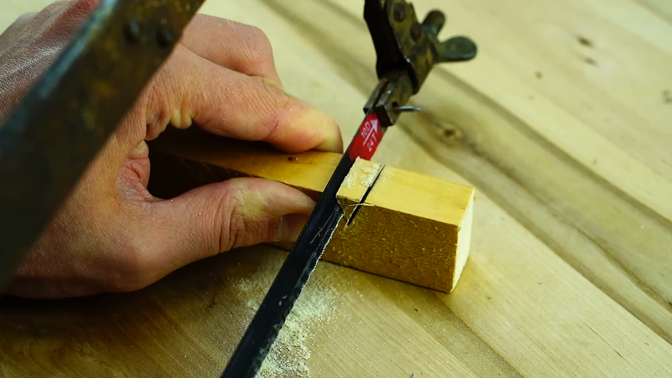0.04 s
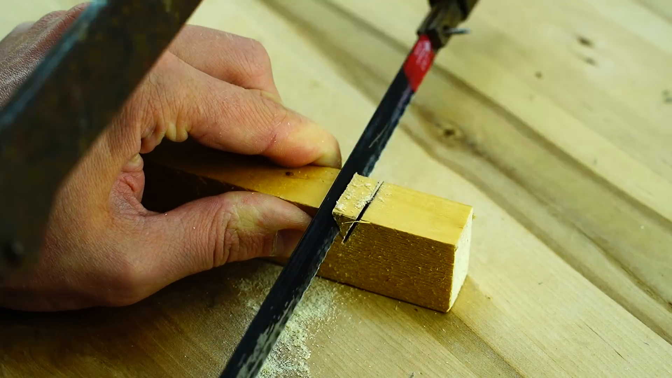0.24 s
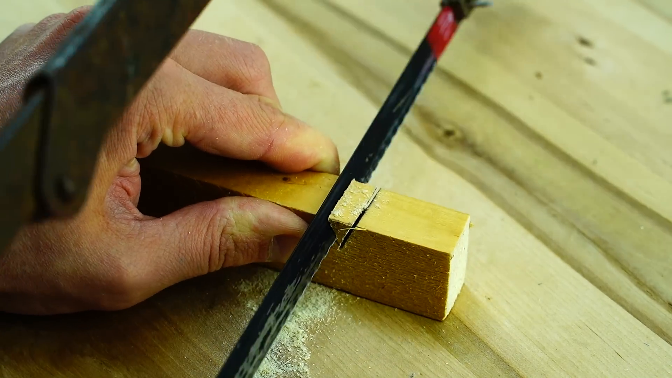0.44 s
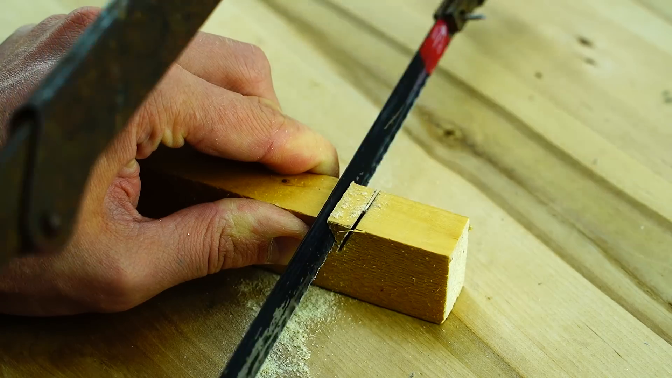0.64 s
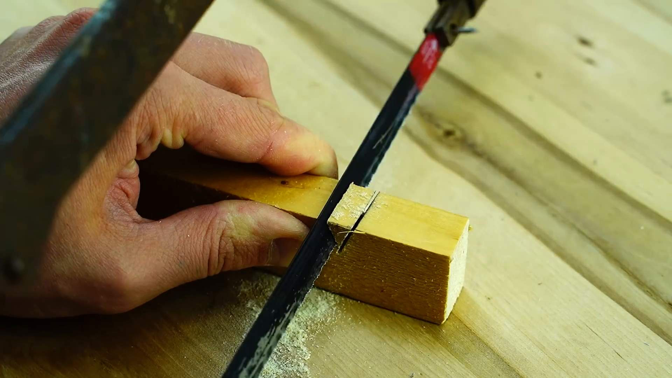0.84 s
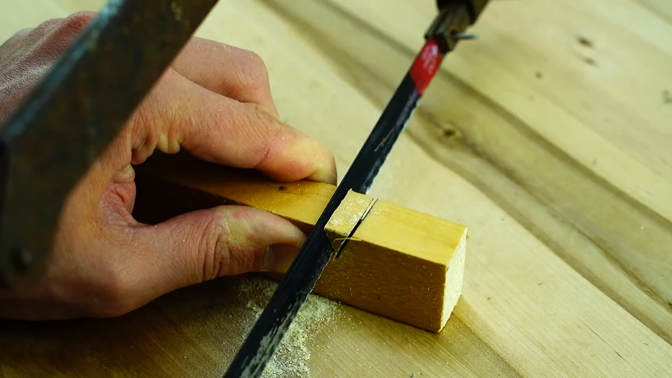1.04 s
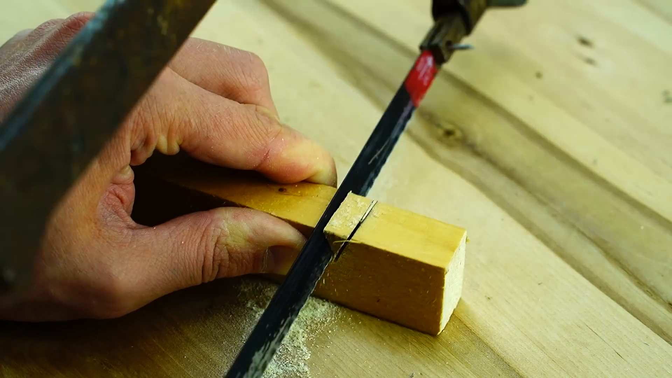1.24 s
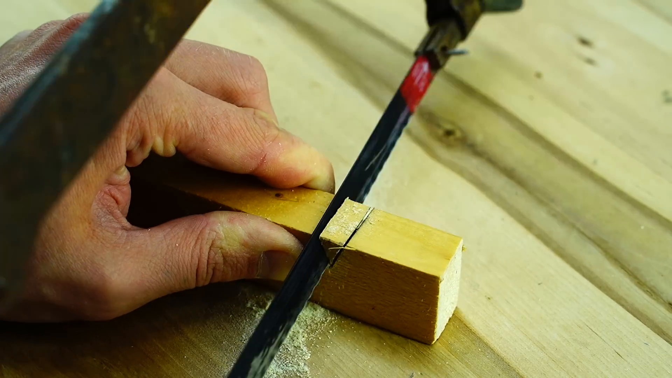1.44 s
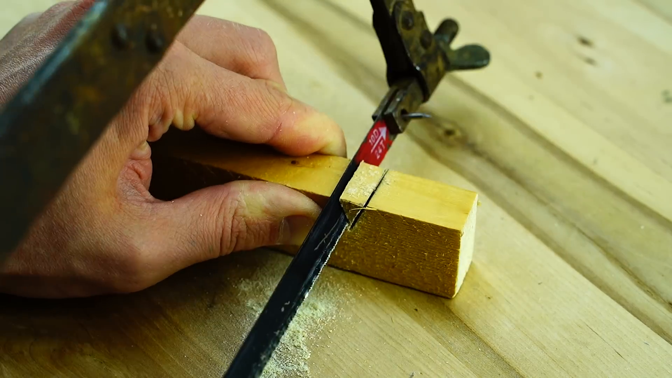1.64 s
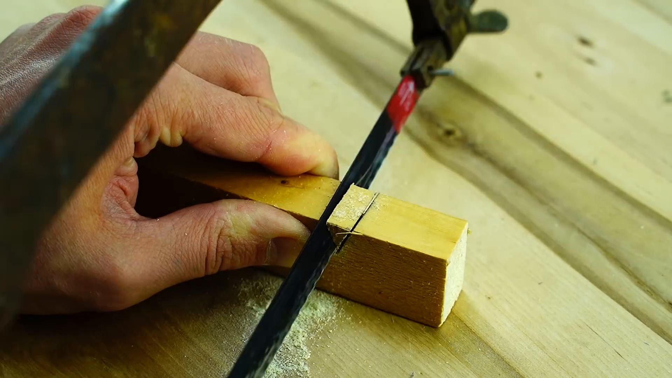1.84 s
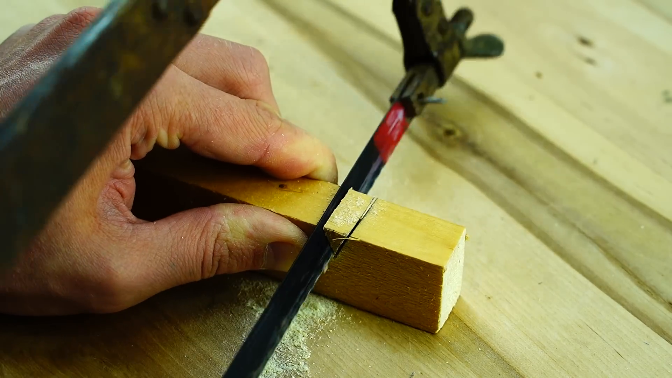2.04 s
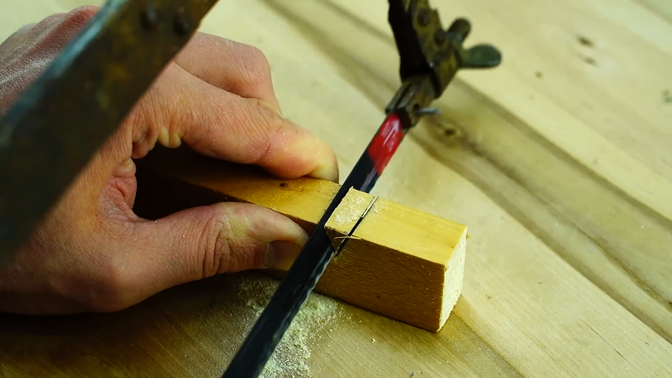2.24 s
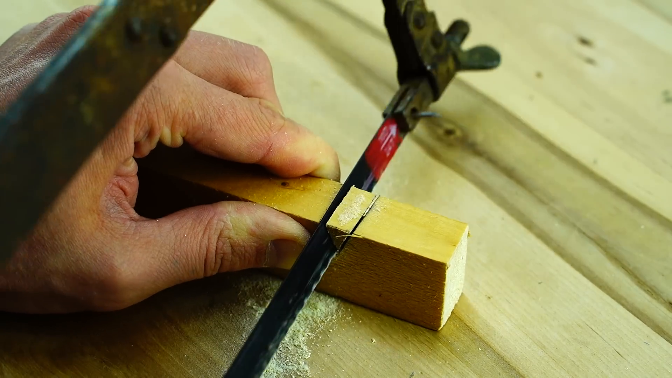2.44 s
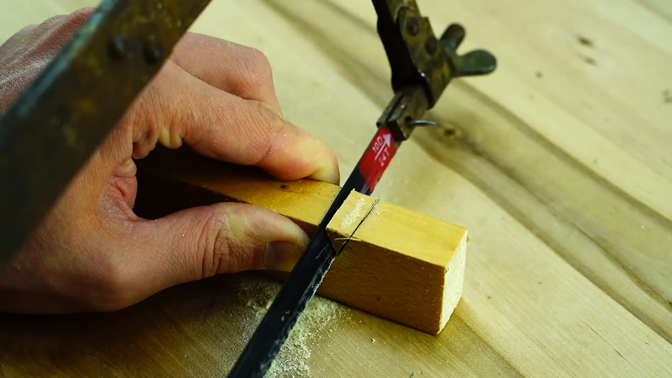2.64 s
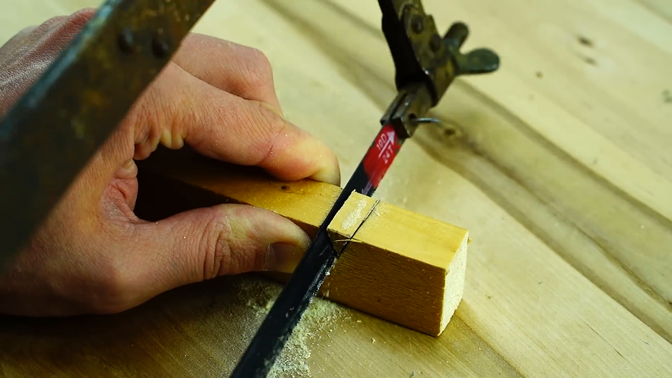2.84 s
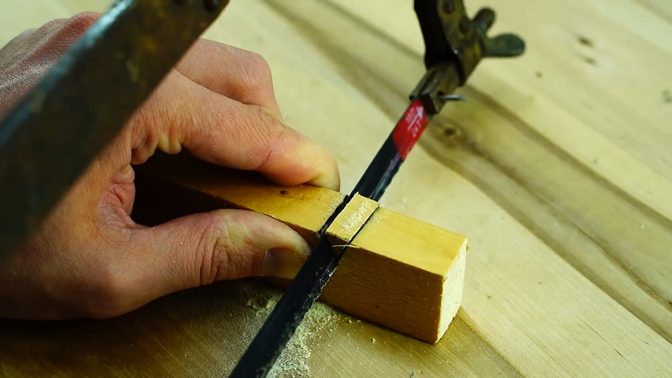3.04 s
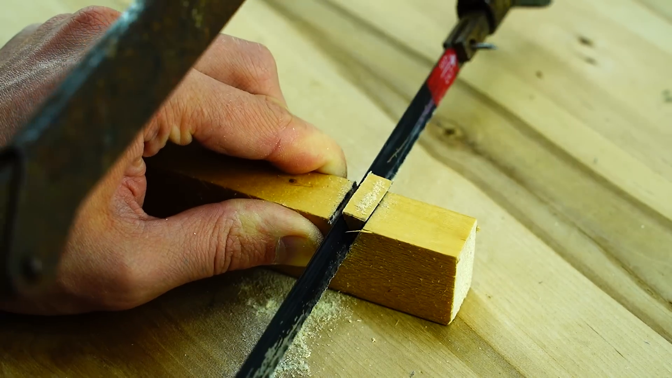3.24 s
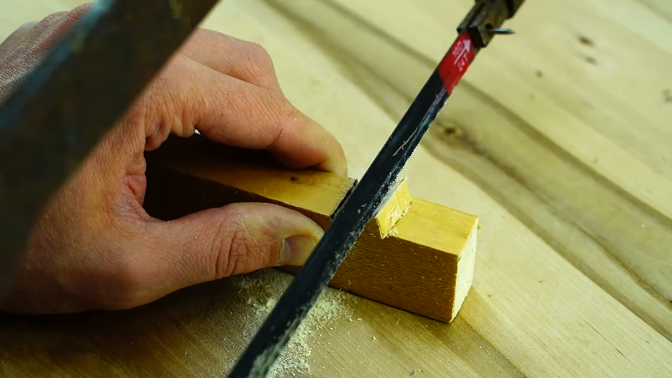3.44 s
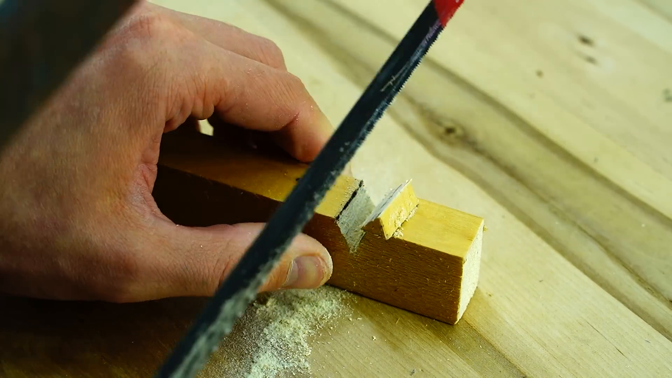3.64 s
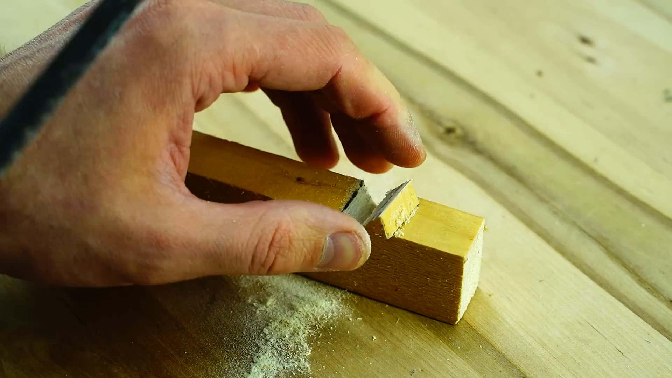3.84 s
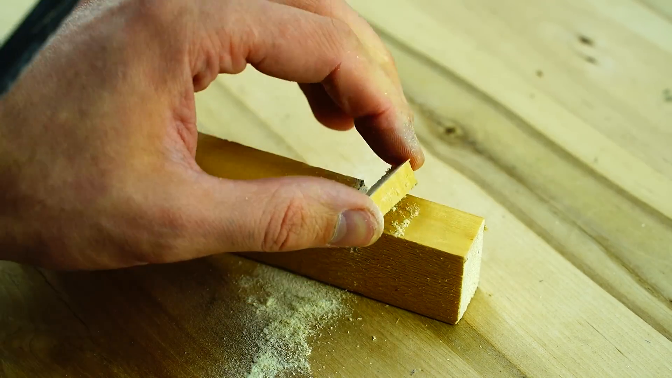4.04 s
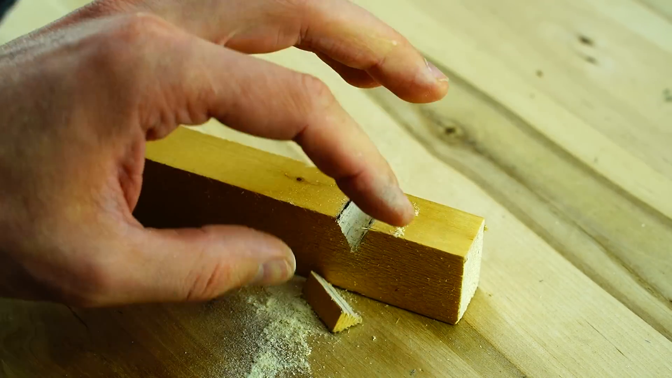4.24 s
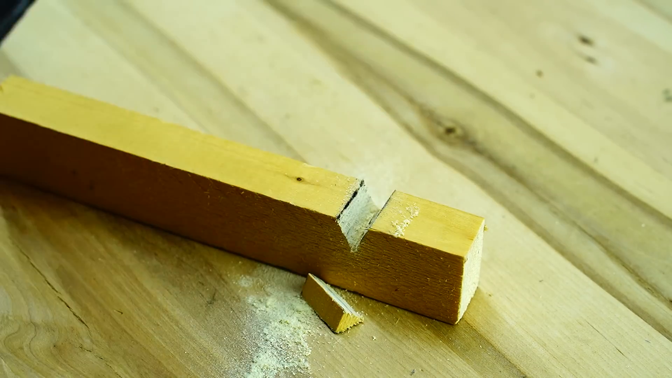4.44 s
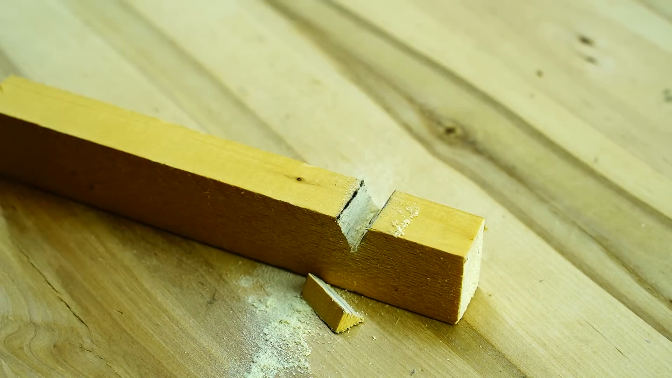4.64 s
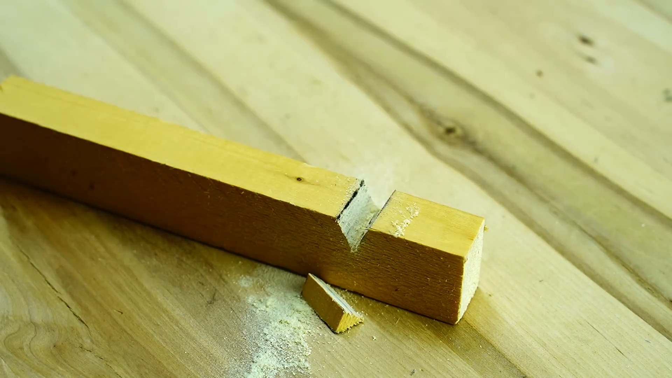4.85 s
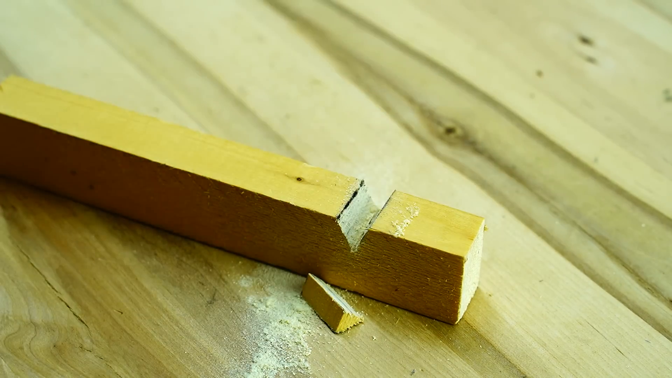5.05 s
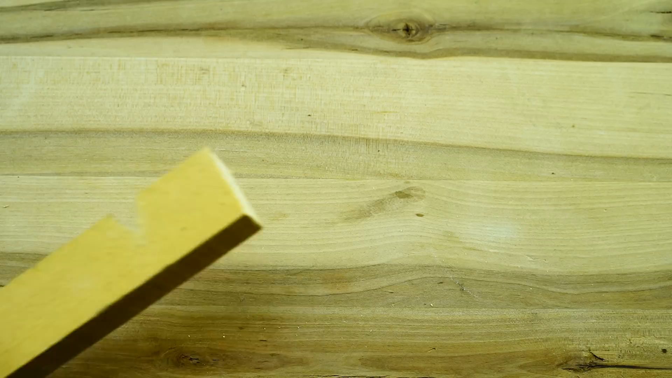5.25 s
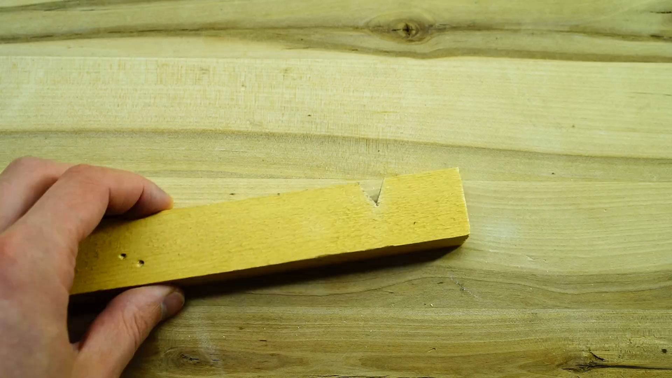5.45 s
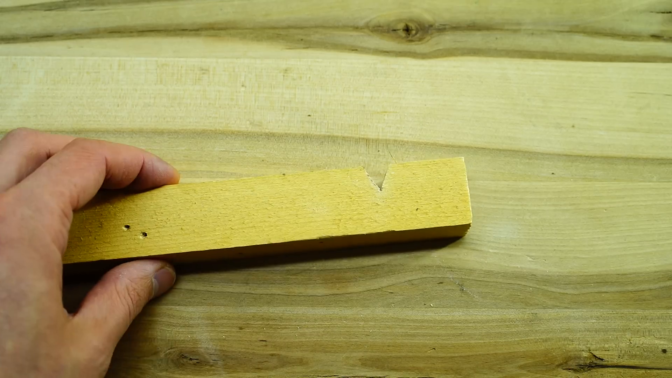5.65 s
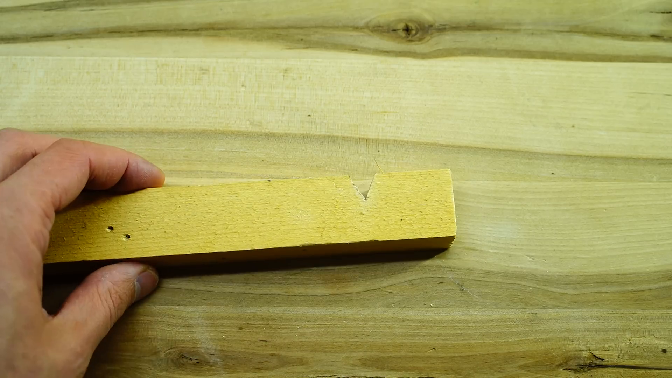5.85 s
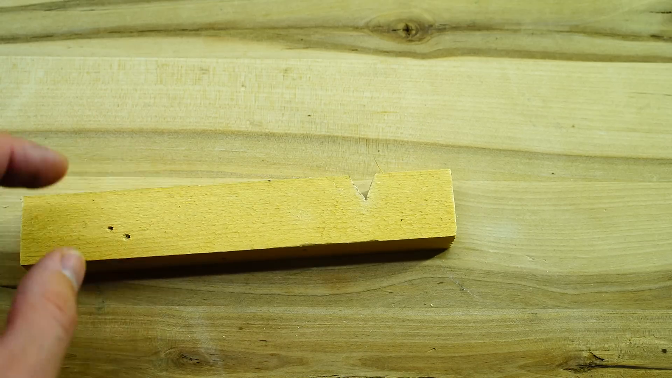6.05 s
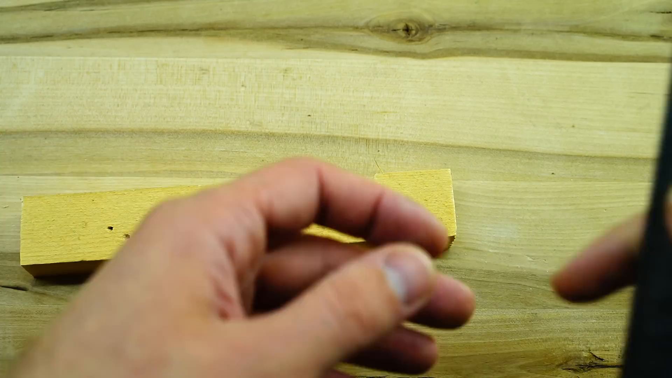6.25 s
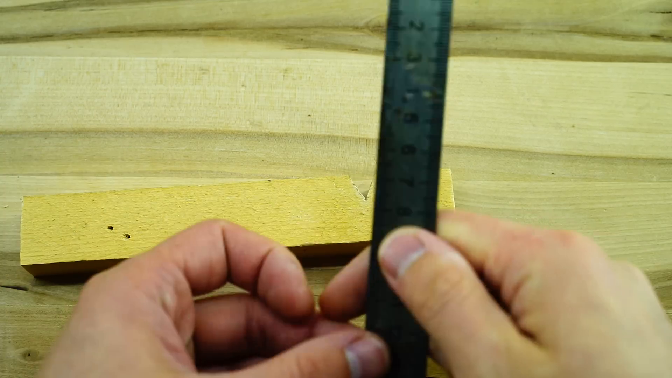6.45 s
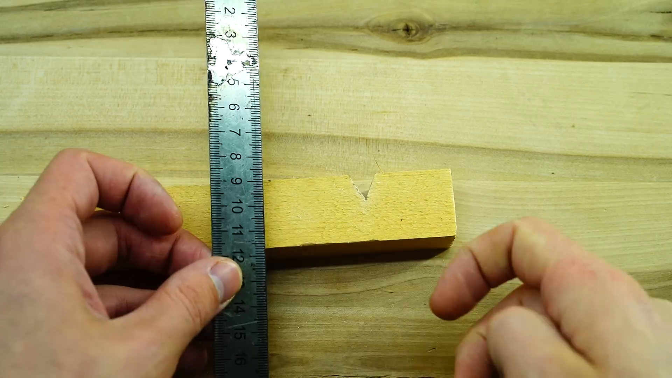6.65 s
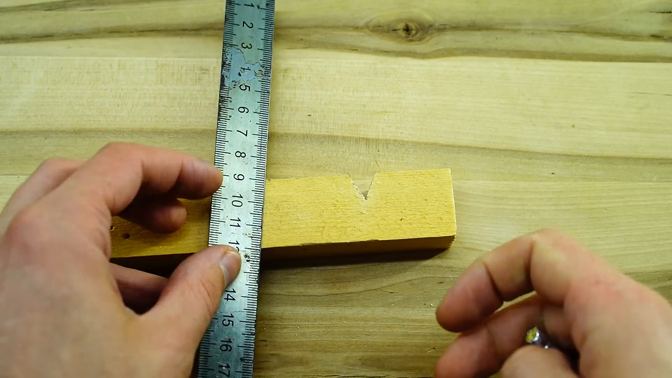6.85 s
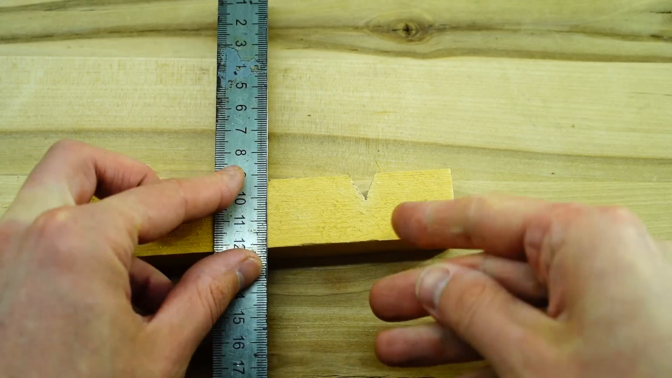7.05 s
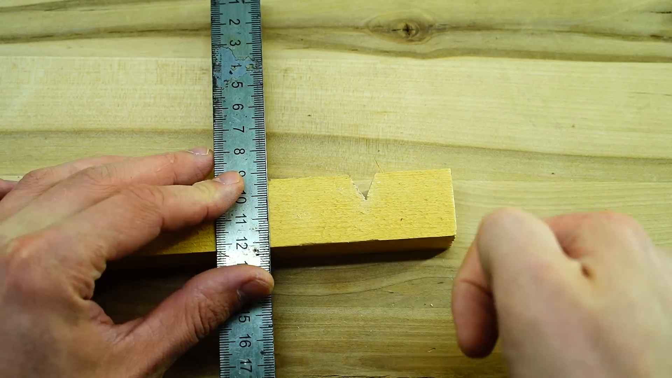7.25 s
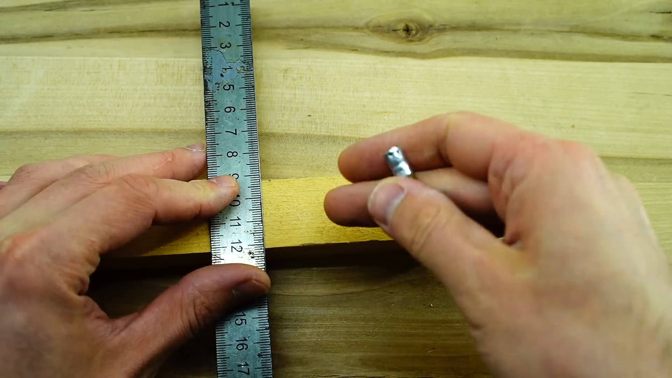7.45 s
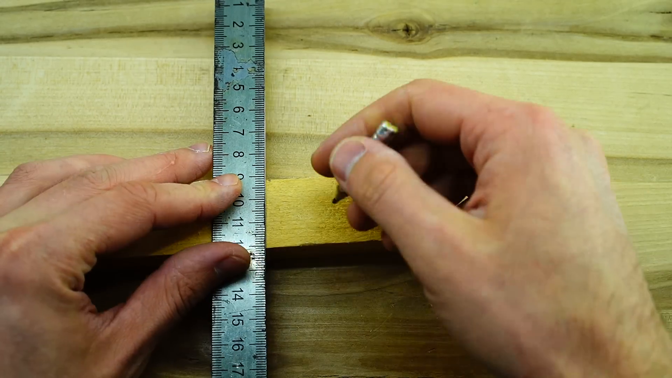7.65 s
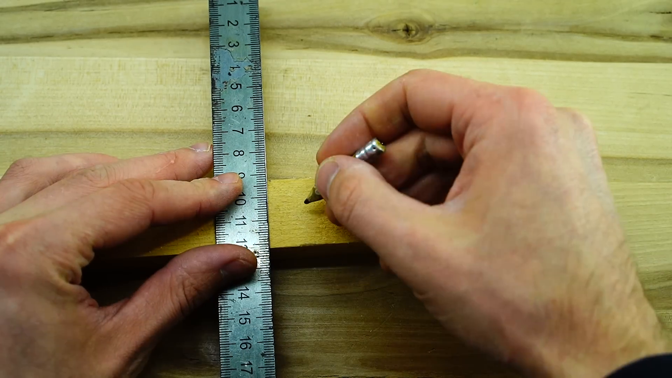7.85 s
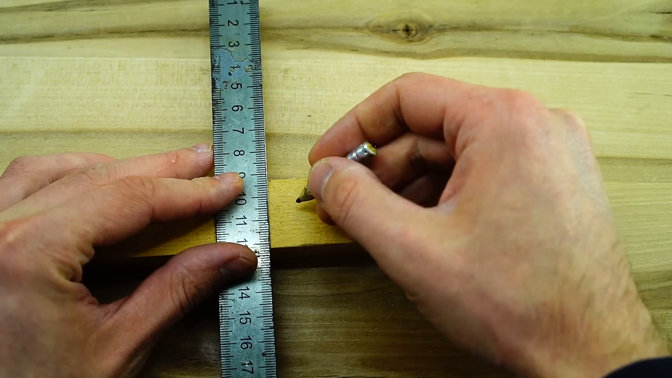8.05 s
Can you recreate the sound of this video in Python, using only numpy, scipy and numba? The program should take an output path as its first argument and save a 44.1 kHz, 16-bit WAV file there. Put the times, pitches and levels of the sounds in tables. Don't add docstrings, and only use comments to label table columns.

```python
import sys
import numpy as np
from scipy import signal
from scipy.fft import rfft, irfft
from scipy.io import wavfile
from scipy.ndimage import uniform_filter1d
from numba import njit

SR = 44100
rng = np.random.default_rng(int(sys.argv[2]) if len(sys.argv) > 2 else 0)


def nominal_scale(level):
    x = np.asarray(level, float) / 20
    return 10 ** x


def digitize_waveform(pressure):
    field = np.atleast_2d(pressure).T
    bounded = np.clip(field, -1, 1)
    quanta = np.round(bounded * 32767).astype(np.int16)
    wavfile.write(sys.argv[1], SR, quanta)


N = 357210
T = np.arange(N) / SR
EARS = np.array([[1], [-1]])


def unit(x):
    return x / np.sqrt(np.mean(x ** 2))


def colour(x, points, lo_hz=0, hi_hz=SR):
    f = np.arange(N // 2 + 1) * SR / N + 1
    hz, db = np.transpose(points)
    gain = nominal_scale(np.interp(np.log(f), np.log(hz), db))
    return irfft(rfft(x) * gain * (f > lo_hz) * (f < hi_hz), N)


@njit
def svf(x, hz, width):
    y, b, l = np.empty(len(x)), 0., 0.
    for i in range(len(x)):
        g, k = np.tan(np.pi * hz[i] / SR), width / hz[i]
        v = (b + g * (x[i] - l)) / (1 + g * (g + k))
        b, l, y[i] = 2 * v - b, l + 2 * g * v, k * v
    return y


def walk(rate):
    k = int(SR / rate)
    held = np.repeat(rng.standard_normal(N // k + 1), k)
    return unit(uniform_filter1d(uniform_filter1d(held, k), k)[:N])


def modes(x, table, clump_db=2.5, drift=.012):
    out = 0
    for k, (hz, width_hz, db) in enumerate(table):
        gain = (-1) ** k * nominal_scale(db + clump_db * walk(22.01)) / np.sqrt(width_hz)
        out = out + gain * svf(x, hz * (1 + drift * walk(12)), 1. * width_hz)
    return out


def spread(mid, other, side_points, turned=0):
    side = turned * signal.hilbert(mid).imag + np.sqrt(1 - turned ** 2) * other
    return mid + EARS * colour(side, side_points)


# offset_s, level_db
TURN_FORCE = [(-.04, -29.5), (-.006, -31), (0, -5.5), (0, -7.5), (0.018, -18), (.12, -24.5)]


def force(bite_s, lift_s, levels_db):
    s, db = np.transpose(TURN_FORCE)
    plateau_s = bite_s + (lift_s - bite_s) * np.array([1, 3, 5]) / 6
    slow = np.clip(3.0 + (levels_db[1] - levels_db[0]) / 2.7, 1, 3.5)
    times = np.r_[bite_s + slow * s[:3], plateau_s, lift_s + s[3:]]
    curve_db = np.r_[levels_db[0] + db[:3], levels_db, levels_db[2] + db[3:]]
    return nominal_scale(np.interp(T, times, curve_db, -200, -200))


# bite_s, lift_s, force_db, bite_re_force_db, late_re_force_db
STROKES = [(0.0, 0.052, -36.5, 4, -0.5), (0.113, 0.149, -52.5, 16, 3), (0.1903, 0.265, -24.5, 5, -4.5),
           (0.316, 0.37, -14.5, -1.5, -5), (0.395, 0.467, -19, -3.5, 1), (0.501, 0.584, -17.5, -5.5, -4),
           (0.619, 0.683, -18.5, -1, -1.5), (0.718, 0.794, -17, -2.5, -3), (0.82, 0.893, -22, -0.5, -4.5),
           (0.936, 0.999, -16, -5, -5.5), (1.034, 1.097, -18.5, -2.5, -2), (1.133, 1.212, -17, -7.5, -4.5),
           (1.235, 1.298, -18.5, 0, -0.5), (1.35, 1.415, -15.5, -7.5, -2.5), (1.447, 1.507, -18.5, -2.5, 0),
           (1.544, 1.625, -17.5, -5.5, -3), (1.759, 1.812, -32, -2.5, 2.5), (1.839, 1.918, -19, 3.5, 2),
           (1.974, 2.039, -15, -4, -7), (2.07, 2.139, -17.5, 0, -0.5), (2.176, 2.248, -18.5, -4, 1),
           (2.277, 2.346, -23, 0.5, 1), (2.375, 2.451, -21, 1, -1.5), (2.483, 2.557, -21.5, 0.5, 0),
           (2.578, 2.676, -24.5, 0, 1), (2.717, 2.773, -20, 1.5, 2.5), (2.82, 2.87, -21.5, -2, 2.5),
           (2.917, 2.975, -19.5, -7, -2), (3.012, 3.064, -22.5, -9.5, -4.5),
           (3.136, 3.173, -26.5, -5.5, -5.5), (3.194, 3.244, -35.5, -1.5, -11)]
# fastest_at_share_of_stroke, arch_half_length_s, top_tooth_rate_hz, ring_at_bite_hz, ring_at_lift_hz
SPEED_ARCHES = [(0.005, .1, 1040, 1800, 3150), (.7, .17, 920, 1700, 3100), (0.0046, .12, 950, 3100, 2200),
                (.3, .07, 1130, 3200, 2500), (.75, .06, 1250, 3030, 2870), (.5, .08, 1220, 2900, 3100),
                (.85, .066, 1330, 3100, 2800), (.52, .058, 1090, 3200, 2900), (.75, .09, 1150, 2500, 3018),
                (.48, .05, 1060, 3150, 3150), (.8, .075, 1250, 3100, 2450), (.45, .06, 1100, 2850, 3030),
                (.5, .042, 1260, 2550, 2300), (.55, .08, 1180, 3100, 2850), (.6, .06, 1180, 2500, 3000),
                (.45, .11, 980, 3180, 2900), (0.71, .06, 920, 2900, 2500), (.55, .09, 1020, 2000, 3470),
                (.65, .12, 930, 2600, 2800), (.65, .1, 1060, 2800, 2900), (.6, .15, 1300, 2900, 3100),
                (.75, .09, 1180, 2700, 2800), (0.017, .08, 1400, 3200, 2930), (.9, .1, 1300, 2750, 3120),
                (.75, .1, 1170, 2900, 2810), (.45, 0.043, 1120, 2200, 2770), (0.74, 0.16, 1400, 3175, 2750),
                (0.38, .13, 1030, 2900, 2950), (1.1, .08, 1900, 2650, 2850), (0.44, 0.089, 470, 2300, 3010),
                (0.6, 0.17, 710, 3200, 2600)]
# start_s, level_re_force_db
SNAGS = [(.025, 0), (.1898, 1), (.199, 5), (0.2956, 8), (0.317, -3.5), (0.331, -5), (0.4019, 8.5),
         (.436, 0.5), (.5, 1), (0.616, 6), (0.726, 3.5), (0.8256, 5.5), (.862, 6.5), (0.9295, 6.5),
         (.9456, -0.5), (1.0364, 6), (1.071, 1.5), (1.1324, 5), (1.2397, 6), (1.351, 4.5), (1.445, 8.5),
         (1.479, 3), (1.55, 4), (1.8373, -2.5), (1.9777, -0.5), (2.0765, -1), (2.1808, 2), (2.1896, 1),
         (2.2845, 6.5), (2.3164, 5), (2.375, 0), (2.4817, 2.5), (2.4939, 4.5), (2.5824, 1), (2.719, 5),
         (2.753, -4), (2.918, 9.5), (3.0104, 5.5), (3.1351, 4), (3.1444, 5.5), (3.2113, 6)]
# middle_s, half_length_s, level_db
CLEAR_NOTES = [(0.004, 0.0053, -32), (0.203, 0.0054, -10), (0.354, 0.027, -23.5), (0.421, 0.0077, -18.5),
               (0.437, 0.0097, -26), (0.56, 0.012, -16.5), (0.637, 0.022, -24), (0.774, 0.019, -12.5),
               (0.84, 0.021, -12), (0.977, 0.018, -17), (1.05, 0.033, -18), (1.188, 0.014, -19.5),
               (1.262, 0.013, -15), (1.475, 0.036, -18.5), (1.611, 0.028, -21.5), (1.864, 0.03, -17.5),
               (2.023, 0.019, -15.5), (2.093, 0.031, -17.5), (2.18, .015, -25.5), (2.3, 0.019, -15),
               (2.512, 0.018, -13.5), (2.655, 0.016, -31.5), (2.738, 0.017, -12), (2.863, 0.01, -36.5),
               (2.943, .022, -14), (2.987, 0.017, -25)]


def controls():
    rasp, held, hz, ring_hz = 0, 0, np.full(N, 300.), np.full(N, 2900.)
    for stroke, arch in zip(STROKES, SPEED_ARCHES):
        bite, lift, db, bite_db, late_db = stroke
        share, half, top_hz, *rings_hz = arch
        push = force(bite, lift, db + np.array([bite_db, 0, late_db]))
        rasp, held = rasp + push, held + push / push.max()
        now = (T > bite - .012) & (T < lift + .2)
        phase = np.clip((T[now] - bite - share * (lift - bite)) / half, -1, 1)
        hz[now] = top_hz * np.cos(phase * np.pi / 2).clip(0) ** .7
        ring_hz[now] = np.interp(T[now], [bite, lift], rings_hz)
    snag_fade_s = 0.0093
    snag_db = sum(db * (T > s) * np.exp(-np.abs(T - s) / snag_fade_s) for s, db in SNAGS)
    rasp = rasp * nominal_scale(snag_db - 1.76)
    clear = sum(nominal_scale(db) * np.exp(-((T - s) / half) ** 2) for s, half, db in CLEAR_NOTES)
    note = np.sqrt(held) * clear + nominal_scale(-17.0) * rasp
    dust = nominal_scale(-4.5 - 2 * T) * rasp * held ** 0.24
    bar = nominal_scale(-5) * rasp
    return rasp, dust, bar, note, hz.clip(300), ring_hz


def teeth(hz, scatter_db=4.5, fibre=3.04):
    turns = np.cumsum(hz * (1 + .05 * walk(250))) / SR
    blows = np.diff(np.floor(turns), prepend=0) * nominal_scale(scatter_db * rng.standard_normal(N))
    crackle = rng.standard_normal(N) * nominal_scale(2.35 * walk(500) + 1.52 * walk(70))
    fibres = crackle * (0.27 + np.exp(-(turns % 1) / 0.73))
    return unit(blows), unit(blows) + fibre * unit(fibres)


def tooth_note(blows, scrape, hz):
    sung = svf(svf(blows, hz, 170.), hz, 170.)
    sung = sung / np.sqrt(uniform_filter1d(sung ** 2, size=1500) + 1e-6)
    sung = sung * np.clip(hz / 850, 0, 1) ** 1.5
    sung = sung * nominal_scale(2.6 * walk(130) - 2)
    blur = svf(svf(scrape, hz, 420.), hz, 420.)
    return sung + .5 * blur / np.sqrt(uniform_filter1d(blur ** 2, size=1500) + 1e-6)


# pitch_hz, width_hz, level_db
BLADE_MODES = [(1870, 47, 5), (2340, 60, 2), (2090, 80, -5), (2505, 70, -1), (2660, 37, 2.5), (2885, 32, 1),
               (3032, 30, 1), (3190, 31, 6), (3786, 38, -4), (4710, 22, 1.5), (5320, 21, -12.5),
               (6200, 39, -15), (7100, 40, -20)]
# pitch_hz, width_hz, level_db
EDGE_MODES = [(8130, 61, -4), (10360, 260, 1), (11300, 130, -4.5), (12400, 160, 3), (13300, 360, -9)]
# pitch_hz, width_hz, level_db
BAR_BODY = [(646, 44, -5), (737, 60, -6.5), (864, 56, 0), (1004, 67, -1.5), (1159, 48, -3.5),
            (1236.5, 16, -1), (1401, 43, -1)]
# frequency_hz, level_db
RASP_SPECTRUM = [(880, -42), (1500, -3.5), (2360, -3), (2800, -0.5), (4130, -16), (6230, -20.5),
                 (7000, -34.5), (9100, -53), (15400, -120)]
# frequency_hz, level_db
DUST_SPECTRUM = [(3820, -12), (6500, -0.5), (7200, -9), (7970, -4.5), (8690, -6.5), (13400, -3),
                 (15400, -9.5), (16000, -23.5)]


def saw(rasp, dust, bar, note, hz, ring_hz):
    blows, scrape = teeth(hz)
    roam = sum(unit(svf(scrape, ring_hz * (ratio + 0.038 * walk(40)), 180.0)) for ratio in (.88, .98, 1.07))
    blade = unit(modes(scrape, BLADE_MODES)) + 1.06 * unit(colour(scrape, RASP_SPECTRUM)) + 0.54 * roam
    blade = unit(colour(blade, [(1200, -2.0), (1700, -3.0), (6500, 2.5), (8000, -6.5)]))
    sung = tooth_note(blows, scrape, hz)
    body = unit(modes(scrape, BAR_BODY))
    hiss = unit(scrape) + 0.38 * unit(modes(scrape, EDGE_MODES))
    hiss = unit(colour(hiss, DUST_SPECTRUM))
    return rasp * blade + 0.77 * note * sung + 0.82 * bar * body + dust * hiss


# frequency_hz, side_minus_mid_db
SAW_SIDE = [(60, -30), (110, -54), (200, -35.5), (380, -32.5), (700, -30.5), (1290, -9.5), (2380, -8),
            (4400, -3), (8120, 0), (15000, 1)]
# frequency_hz, left_minus_right_db
SAW_LEAN = [(60, -9.5), (110, 1.5), (200, -15.5), (380, -3.5), (700, 1), (1290, -2.5), (2380, 4),
            (4400, -2.5), (8120, 0), (15000, -3)]


def stereo_saw(moves):
    rasp = spread(saw(*moves), saw(*moves), SAW_SIDE, turned=0.45)
    hz, lean_db = np.transpose(SAW_LEAN)
    return np.array([colour(rasp[k], np.transpose([hz, EARS[k] * lean_db / 2])) for k in range(2)])


# start_s, level_db
SHOVES = [
    (0.23, -32.5),
    (0.472, -32),
    (1.87, -28.5),
]


def bench(bar):
    rise_db_s, fall_db_s, sway_db, still_s = 407.5, 134, -50, 3.5
    shoves = [db + np.minimum(rise_db_s * (T - s), fall_db_s * (s - T)) for s, db in SHOVES]
    boom_db = np.max(shoves, axis=0).clip(sway_db)
    boom = np.sqrt(2) * np.sin(2 * np.pi * np.cumsum(83 + 6 * walk(17)) / SR)
    thud = rng.standard_normal(N) * nominal_scale(3.55 * walk(25.82))
    thud_spectrum = [(90, -2.5), (130, 3.0), (200, -7.0), (300, -6.0), (500, 0.5), (650, -15.5)]
    thud = unit(colour(thud, thud_spectrum))
    sway = uniform_filter1d(bar, size=2200)
    swing = np.clip(sway / uniform_filter1d(sway, size=9000).clip(1e-6), .2, 3)
    between = np.clip((-43.0 - boom_db) / 6, 0, 1)
    boom_db = boom_db + (1.9 * walk(14) + 10 * np.log10(swing)) * between
    sawing = np.clip((still_s - T) / 0.2, 0, 1)
    return nominal_scale(boom_db) * boom * sawing + nominal_scale(-27.0) * bar ** 0.39 * thud


# frequency_hz, level_db
AIR_SPECTRUM = [(15, -39), (30, -11.5), (114, -8.5), (145, -2.5), (223, -4), (277, -5.5), (326, -4.5),
                (545, -5.5), (714, -6), (1190, -8.5), (2110, -15), (4250, -18.5), (16000, -22)]
# frequency_hz, side_minus_mid_db
AIR_SIDE = [(60, -22.5), (110, -17), (200, -12.5), (380, -8.5), (700, -3.5), (1290, 1.5), (2380, 1),
            (4400, 2), (8120, 1.5), (15000, 2)]
# time_s, gain_db
GAIN = [(3.4, -0.5), (3.562, -1), (4.946, 4), (5.12, 0.5), (5.13, -8), (5.42, -2), (5.47, 6), (5.58, 1),
        (5.68, 1), (7.4, 2.5), (8.1, 1.1)]
# level_db, share_of_gain_change
ROOM_BANDS = [
    (-62.5, 0.87),
    (-55, 0.9),
    (-57, 1.25),
]


def floor():
    later_view_s, later_rumble_db = 5.45, 4
    noise = colour(rng.standard_normal((2, N)), AIR_SPECTRUM)
    noise = noise + 1.27 * signal.lfilter(*signal.iirpeak(1210, 14, SR), noise)
    edges_hz = 20, 115, 1600, SR / 2
    gain_db = np.interp(T, *np.transpose(GAIN))
    out = 0
    for k, (db, share) in enumerate(ROOM_BANDS):
        mid, side = colour(noise, [(20, 0), (SR, 0)], edges_hz[k], edges_hz[k + 1])
        level_db = db + share * gain_db + 0.5 * walk(6)
        if k == 0:
            level_db = level_db + later_rumble_db * (T > later_view_s)
        out = out + nominal_scale(level_db) / np.std(mid) * spread(mid, side, AIR_SIDE)
    return out * nominal_scale(-4 * (T < 3.3))


# start_s, peak_db, ring_hz, treble_db, left_minus_right_db
TICKS = [(0.1105, -21, 2220, -22, 5), (3.151, -19.5, 6000, 4, -7), (3.211, -31, 6000, -5, 0),
         (3.454, -24, 2840, -18, 2.0), (3.458, -37, 6000, -6, 7), (3.655, -38.5, 5400, 7, -5),
         (3.8644, -47, 12400, -17, 3.5), (3.918, -45.5, 5600, 13, 0.0), (3.9804, -35, 13000, -21, 3),
         (4.0342, -37, 1500, 1, 7), (4.27, -26.5, 1920, -12, -5), (4.8913, -37, 12050, -21, 12),
         (6.091, -37, 11000, -2, -3), (6.452, -30, 12700, -15, -2.5), (7.012, -36, 710, -12, 0),
         (7.3225, -33, 600, -14, 0), (7.028, -31, 1630, -10, -0.5), (7.1167, -34.5, 1900, 4, 0.5),
         (7.1736, -38, 1530, -5, 0.0)]


def ticks():
    out, t = np.zeros((2, N)), T[:SR // 5]
    high = signal.butter(2, 7000, "high", fs=SR)
    for s, db, hz, treble_db, pan_db in TICKS:
        noise = rng.standard_normal((3, len(t)))
        ring = 0.99 * svf(noise[0], hz + 0 * t, 0.13 * hz) + 0.1 * noise[1]
        snap = nominal_scale(treble_db - 60 * t / 0.018) * signal.lfilter(*high, noise[2])
        knock = nominal_scale(-60 * t / 0.092) * ring + .5 * snap
        knock[:3] -= 1.4 * np.array([.5, 1, .5])
        a = int(s * SR)
        out[:, a:a + len(t)] += nominal_scale(db + EARS * pan_db / 2) * knock
    return out


# middle_s, half_length_s, pitch_hz, level_db
THUMPS = [(.482, 0.0197, 170.5, -32.5), (1.21, 0.043, 204, -38), (1.812, .016, 260.1, -31),
          (2.06, .03, 220.3, -37.5), (1.78, .02, 170, -42), (3.27, .05, 77.44, -49), (3.66, .012, 679, -48),
          (5.58, 0.055, 61.1, -50.5), (6.63, 0.053, 60, -53), (7.33, 0.017, 423, -39),
          (7.33, 0.072, 65, -49), (7.36, 0.061, 155, -48)]
RUSTLES = [(1.6, .02, 240, -38), (3.0, 0.27, 520, -42), (1.69, 0.06, 6000, -38), (4.85, 0.31, 520, -51.5),
           (4.81, 0.32, 11000, -50), (5.7, .075, 13000, -62), (3.165, .035, 910, -32.5),
           (3.215, 0.03, 930, -42), (1.8, 0.035, 400, -34.5), (.212, 0.026, 1130, -24.5),
           (1.86, 0.03, 660, -25.5), (2.72, 0.018, 600, -27.5), (.625, .015, 610, -28.5),
           (5.26, .17, 7000, -62), (6.1, 0.05, 640, -46), (6.3, 0.04, 6400, -51), (7.466, 0.013, 7600, -48)]
RUBS = [(1.56, 0.015, 1370, -26), (2.39, 0.013, 1398.6, -30), (3.6, 0.026, 2798, -57),
        (3.35, 0.013, 2800, -54), (3.466, 0.013, 2850, -38), (3.59, .03, 14000, -58),
        (3.68, 0.16, 11600, -60), (3.7, 0.11, 10200, -59), (3.75, 0.045, 15200, -58),
        (4.297, 0.02, 2000, -53), (2.65, .035, 620, -33), (3.07, .03, 1900, -41), (.89, .03, 1740, -32),
        (4.72, 0.087, 11400, -49), (7.9, .2, 1500, -58), (6.17, .08, 14300, -55), (6.18, .05, 12000, -52),
        (5.5, .06, 1900, -48), (2.99, .025, 820, -30), (7.025, 0.024, 680, -43.5),
        (7.468, 0.024, 3110, -40.5)]
RINGS = [(3.4, 0.036, 11300, -65), (3.42, .07, 8150, -76), (3.66, 0.082, 5370, -62),
         (5.74, 0.07, 10200, -62), (5.52, 0.1, 6900, -55), (5.54, 0.059, 10200, -53),
         (5.54, .06, 13200, -54), (6.015, .02, 4670, -58), (6.468, 0.018, 15600, -46),
         (3.92, 0.018, 5470, -66), (4.01, .03, 5520, -64), (6.826, 0.014, 5200, -50),
         (7.465, 0.018, 1600, -52)]
JINGLES = [(6.013, 0.025, 12500, -54), (6.132, 0.056, 13300, -52.5), (6.175, 0.074, 12700, -45),
           (6.355, .025, 12800, -53), (6.452, 0.042, 12900, -49), (6.5, 0.027, 12400, -52),
           (6.568, 0.034, 12600, -51), (6.83, 0.043, 12600, -49), (7.03, .035, 13300, -55),
           (7.09, .02, 12300, -55), (7.47, 0.036, 13300, -46)]


def brushes():
    partners = [(s, half, hz + 950., db - 3) for s, half, hz, db in JINGLES]
    # table, resonance width over pitch, left minus right dB, sharpness of the swell
    kinds = [(THUMPS, .6, 0, .4), (RUSTLES, 1.1, 0.2, .4), (RUBS, .08, 0.1, .7), (RINGS, .025, 0.1, .4),
             (JINGLES, .05, -2.5, 1.1), (partners, .05, -2.5, 1.1)]
    out, patchy = np.zeros((2, N)), nominal_scale(2.2 * walk(120))
    for table, share, pan_db, sharp in kinds:
        for s, half, hz, db in table:
            a = int((s - half) * SR)
            n = min(int(2 * half * SR), N - a)
            grain = rng.standard_normal((3, SR))[:, :n]
            centre, width = hz + np.zeros(n), 1.7 * share * hz
            alike = np.clip(1500 / hz, .5, 1)
            for ear in range(2):
                rub = alike * grain[2] + (1 - alike) * grain[ear]
                rub = svf(svf(rub, centre, width), centre, width)
                swell = np.hanning(n) ** sharp
                out[ear, a:a + n] += nominal_scale(db + EARS[ear] * pan_db / 2) * unit(rub * patchy[a:a + n]) * swell
    return out


def struck(hits, table, crack_db):
    t, out = T[:SR // 2], np.zeros(N)
    for s, db in hits:
        mix, ring = rng.standard_normal(len(table)), 0
        for m, (hz, mode_db, t60) in zip(mix, table):
            decay = nominal_scale(mode_db + 2.0 * m - 60 * t / t60)
            ring = ring + np.sign(m) * decay * np.sin(2 * np.pi * hz * t)
        crack = signal.lfilter([1, -1], [1, -1.2, .4], rng.standard_normal(len(t)))
        blow = ring / np.abs(ring).max() + nominal_scale(crack_db - 60 * t / 0.025) * crack
        out[int(s * SR):][:len(t)] += nominal_scale(db) * blow
    return out


# start_s, peak_db
OFFCUT_HITS = [
    (4.2695, -24.5),
    (4.2712, -26),
    (4.2745, -31),
    (4.292, -41),
    (4.303, -38),
]
# pitch_hz, level_db, t60_s
OFFCUT_MODES = [(1280, -12, .03), (1900, 0, 0.025), (2500, -1, 0.024), (4250, 3, 0.011), (3700, -8, .02),
                (6000, -7, .015), (8600, -10, .015)]


def offcut():
    return nominal_scale(EARS * -2.5) * struck(OFFCUT_HITS, OFFCUT_MODES, -11.5)


# start_s, peak_db
BAR_HITS = [
    (5.4373, -13),
    (5.4388, -11),
    (5.4415, -12),
    (5.4452, -13),
    (5.457, -19),
]
# pitch_hz, level_db, t60_s
BAR_MODES = [(480, -17, .02), (700, -7, .025), (930, -5, .02), (1265, 0, .02), (1080, -4, .014),
             (1580, -2, .014), (1906, 0, .016), (1750, -4, .012), (2300, -3, .014), (2650, -3, .014),
             (1430, -5, .012), (2100, -5, .012), (3100, -9, .01), (3700, -16, .008), (6500, -20, .01)]


def bar_set_down():
    return nominal_scale(EARS * 1.0) * struck(BAR_HITS, BAR_MODES, -27)


# start_s, peak_db
RULE_HITS = [
    (6.8093, -24),
    (6.8155, -27.5),
]
# pitch_hz, level_db, t60_s
RULE_MODES = [(474, -2, 0.086), (776, 0.5, 0.058), (3900, -2, .02), (5320, 0, 0.05), (7000, 2, 0.013),
              (8576, -30.5, 0.055), (11040, -13, 0.072), (12500, -15, 0.086), (13300, -14, 0.16),
              (13640, -24, 0.058)]


def rule_laid_down():
    return struck(RULE_HITS, RULE_MODES, -10.5)


def room(source):
    t, t60_s = T[:SR // 2], 0.2
    tail = signal.lfilter([1], [1, -.6], rng.standard_normal((3, len(t))))
    tail = tail * nominal_scale(-60 * t / t60_s) * (t > .004)
    tail = (tail[:2] + 2.1 * tail[2]) / np.sqrt(np.sum(tail ** 2))
    return nominal_scale(-11) * signal.fftconvolve(source, tail, axes=1)[:, :N]


def scene():
    moves = controls()
    low_cut = signal.butter(2, 220, "high", fs=SR)
    rasp = signal.lfilter(*low_cut, stereo_saw(moves))
    knocks = signal.lfilter(*low_cut, ticks() + offcut() + bar_set_down() + rule_laid_down())
    tail = room(.6 * knocks + nominal_scale(-6.0) * rasp)
    return rasp + knocks + tail + bench(moves[2]) + brushes() + floor()


def roll_off(x):
    return signal.sosfilt(signal.butter(12, 16130, fs=SR, output="sos"), x)


def record(dry):
    rounded = 0.79 * np.tanh(dry / 0.79)
    cut = signal.ellip(16, .2, 90, 15880, fs=SR, output="sos")
    return roll_off(signal.sosfilt(cut, rounded))


dry = scene()
out = record(dry)
digitize_waveform(out)
```